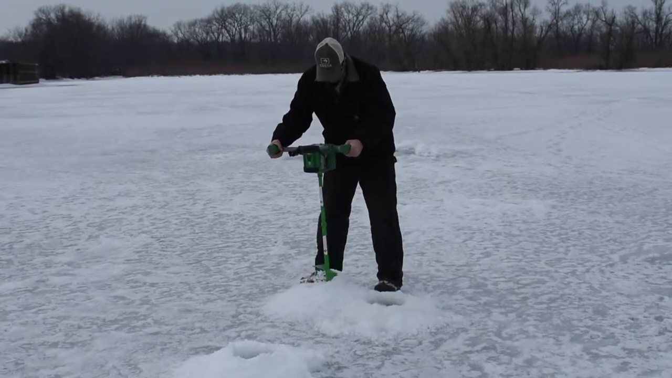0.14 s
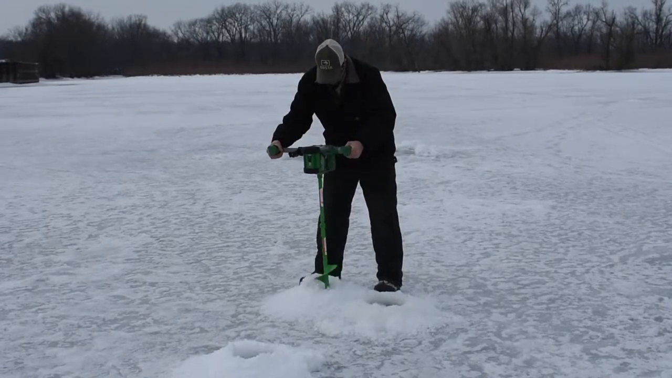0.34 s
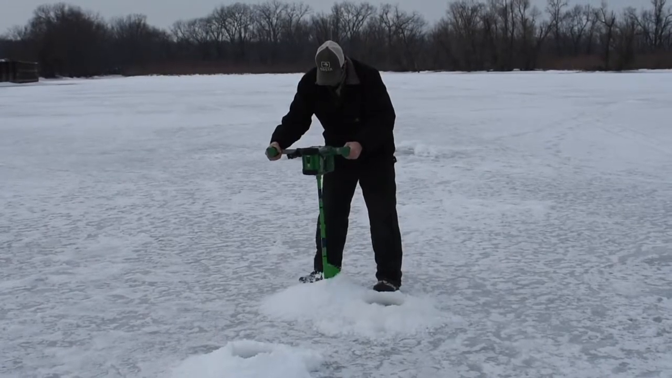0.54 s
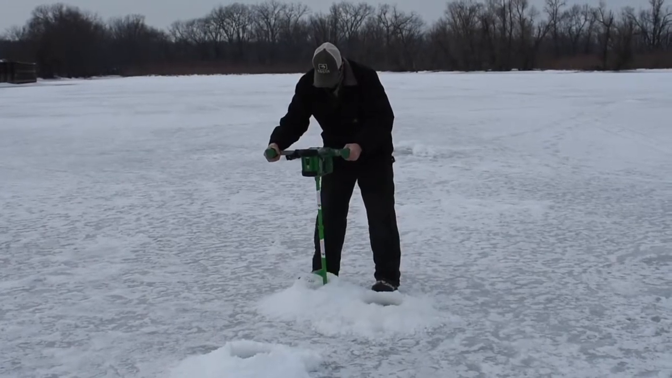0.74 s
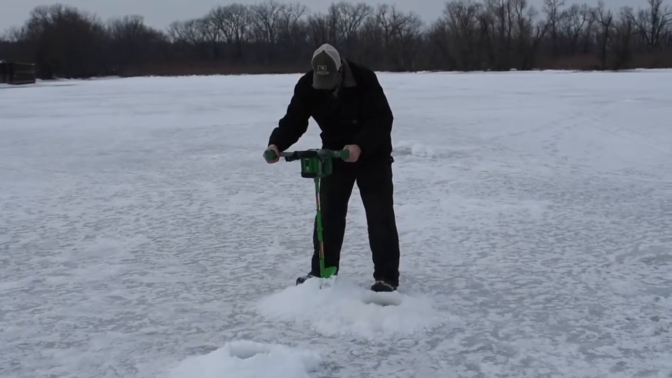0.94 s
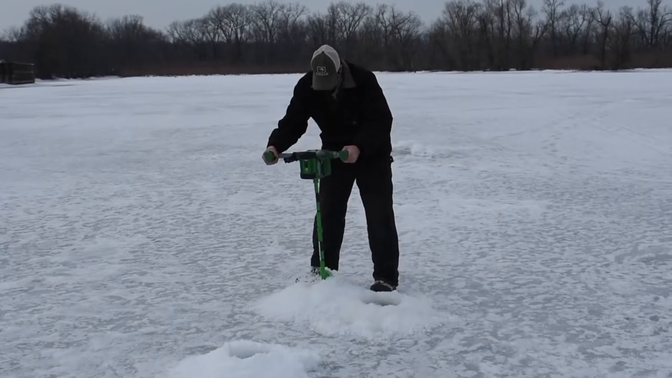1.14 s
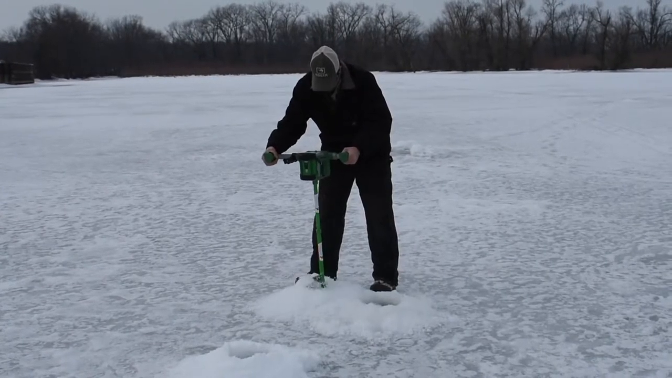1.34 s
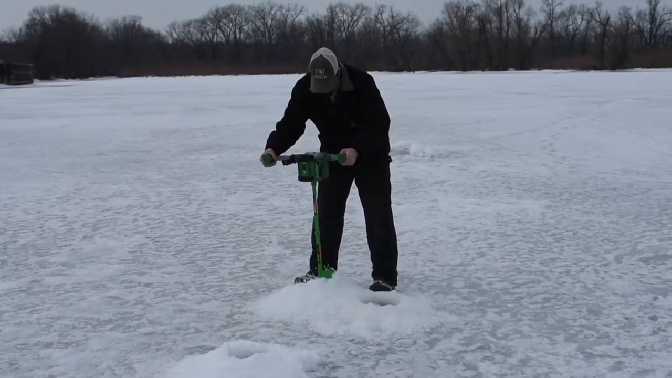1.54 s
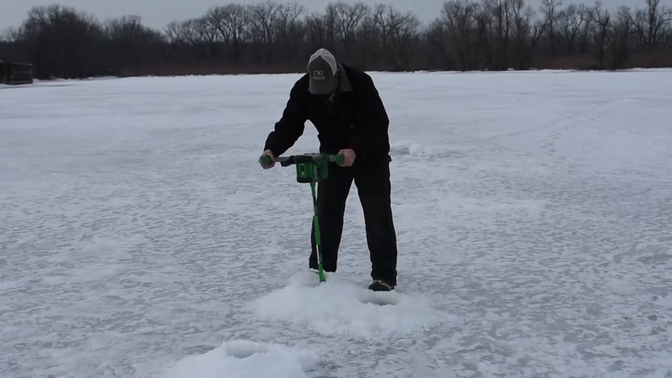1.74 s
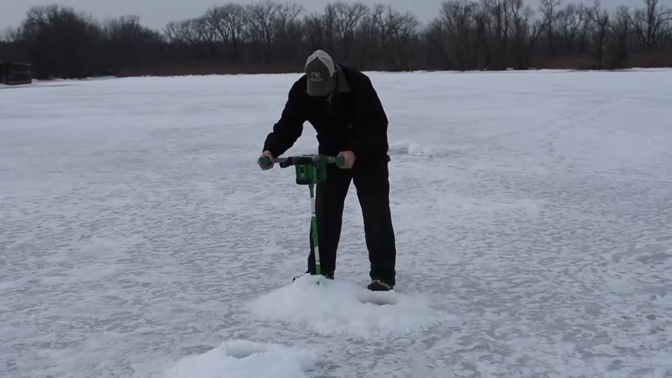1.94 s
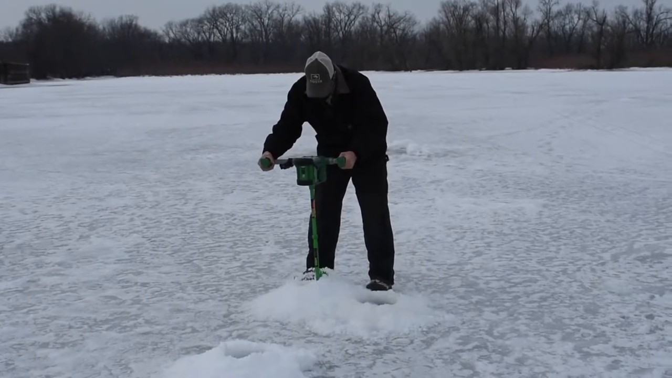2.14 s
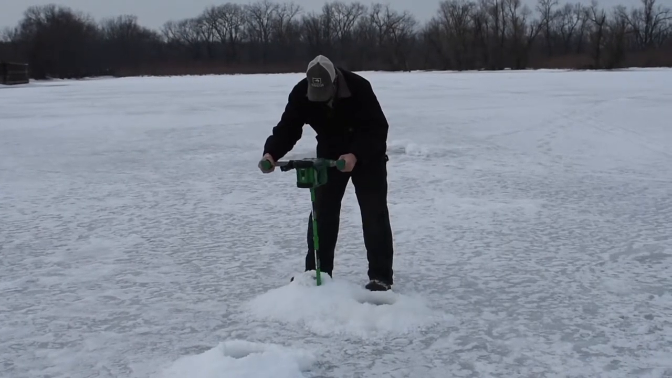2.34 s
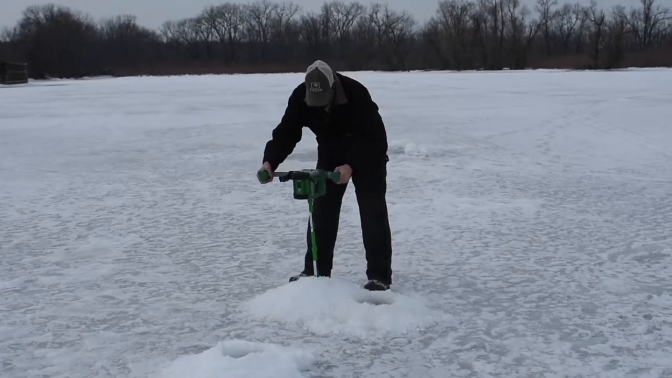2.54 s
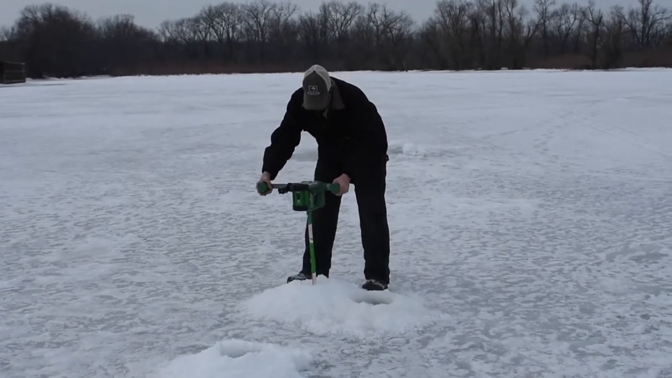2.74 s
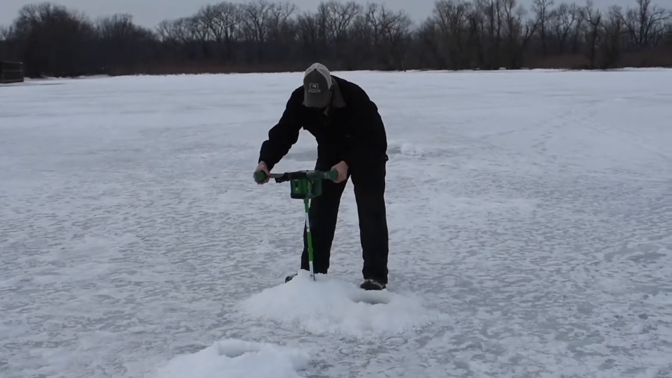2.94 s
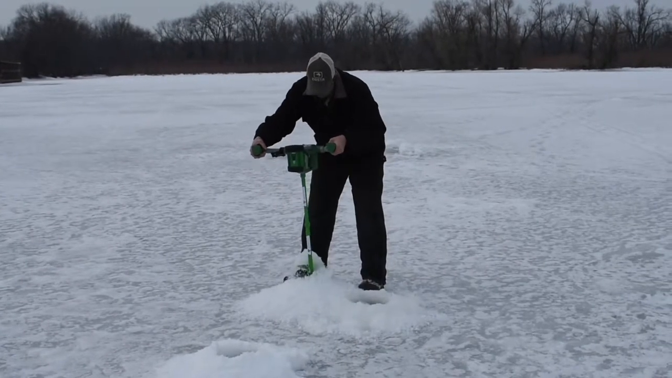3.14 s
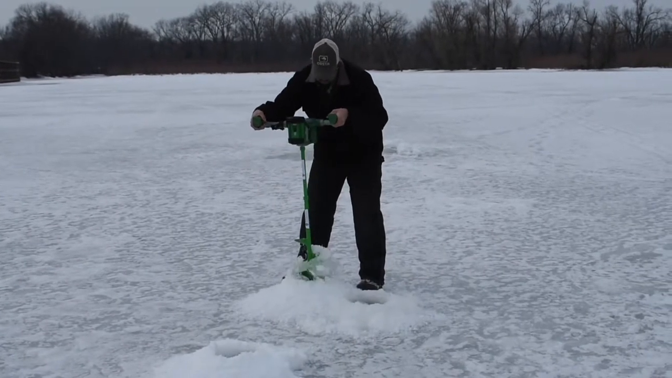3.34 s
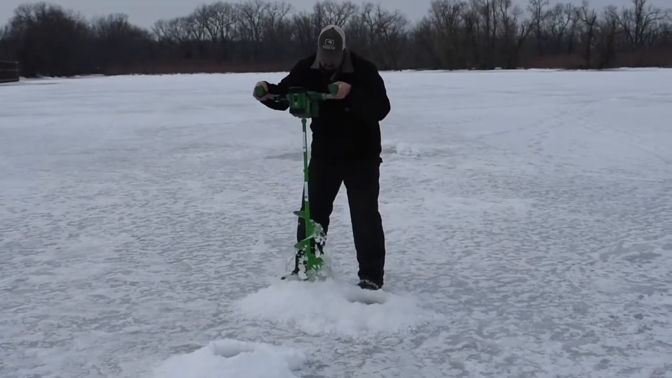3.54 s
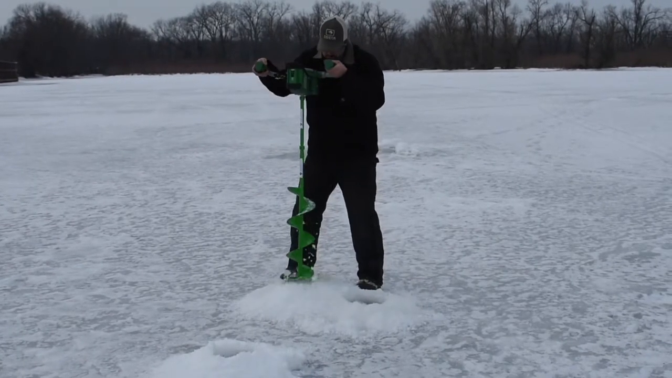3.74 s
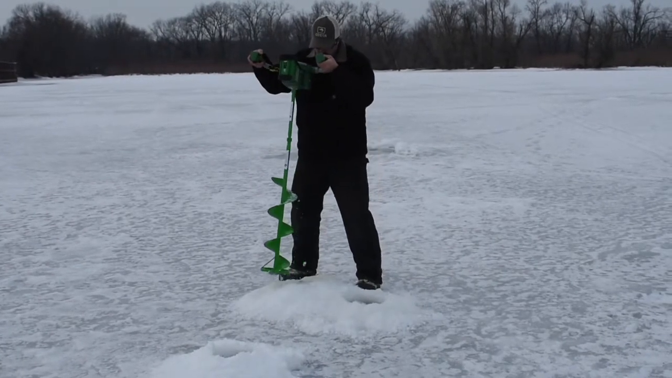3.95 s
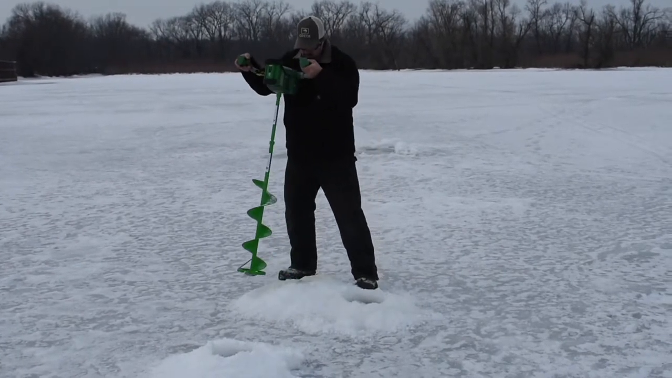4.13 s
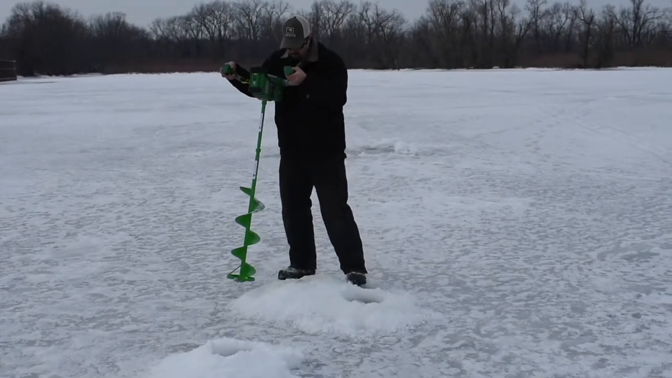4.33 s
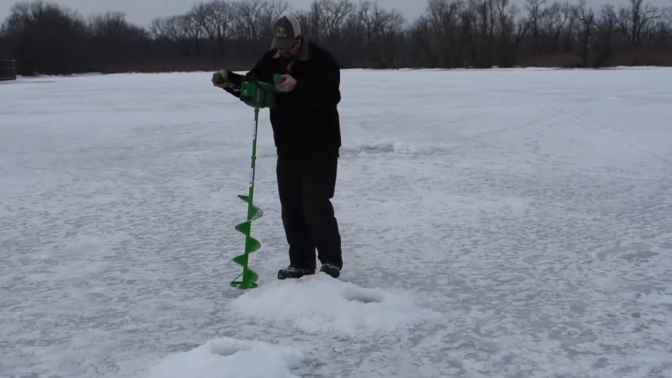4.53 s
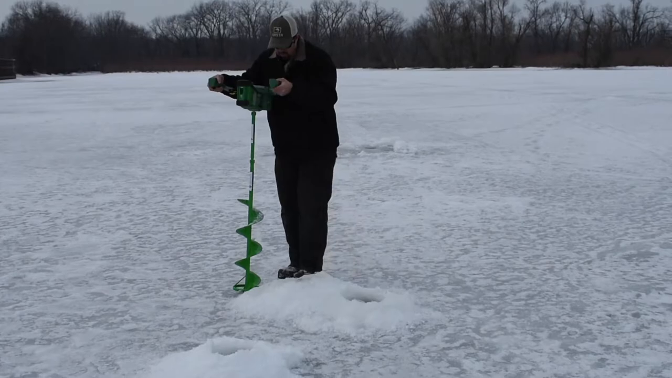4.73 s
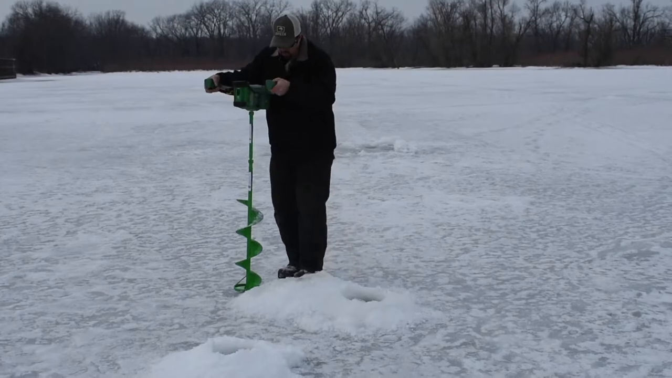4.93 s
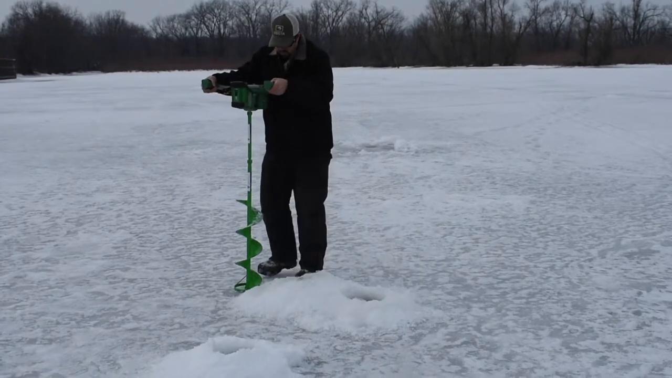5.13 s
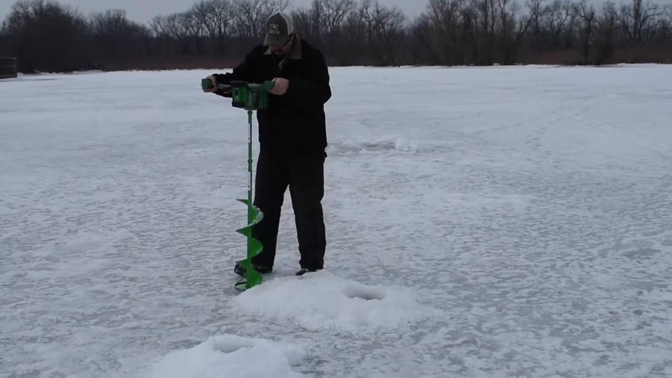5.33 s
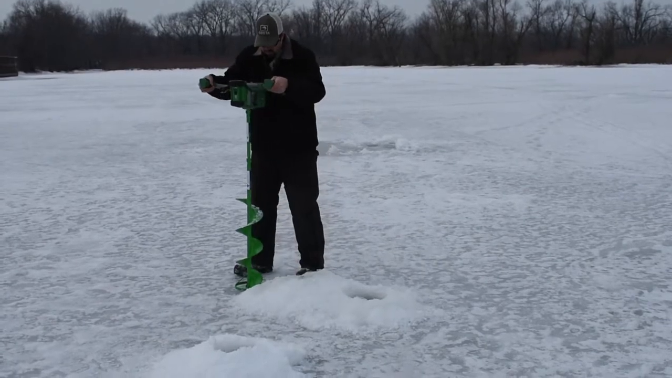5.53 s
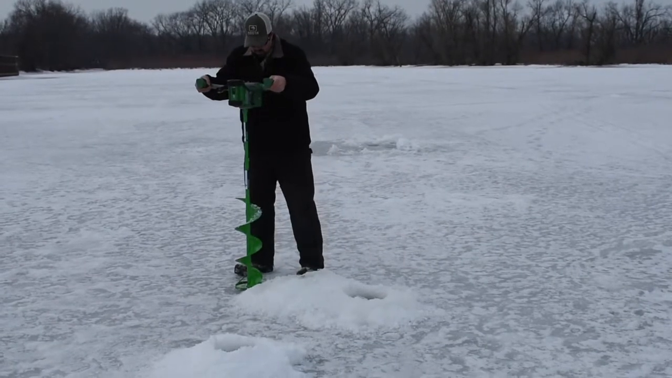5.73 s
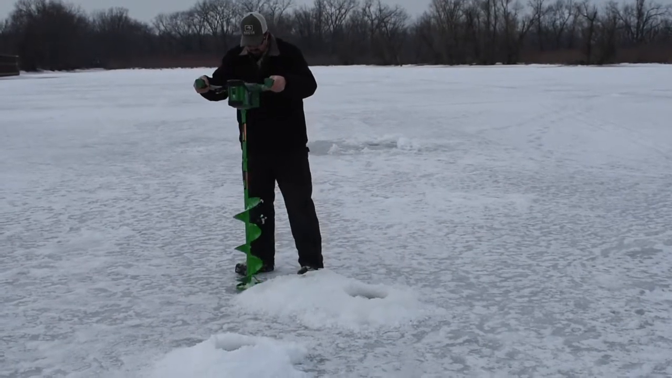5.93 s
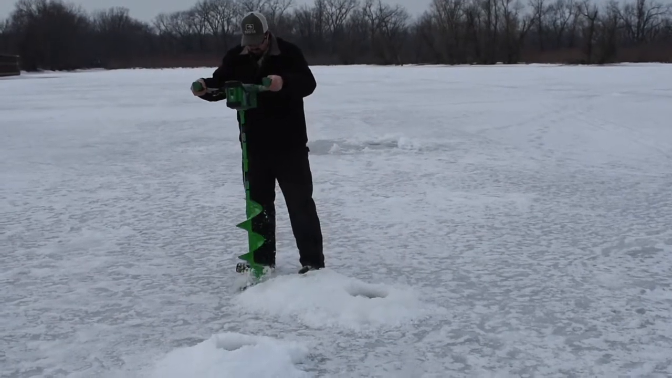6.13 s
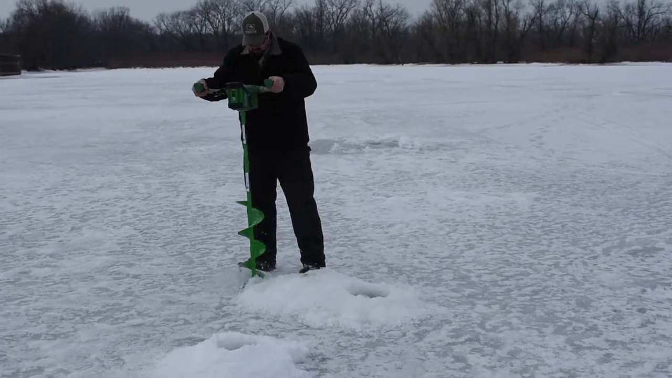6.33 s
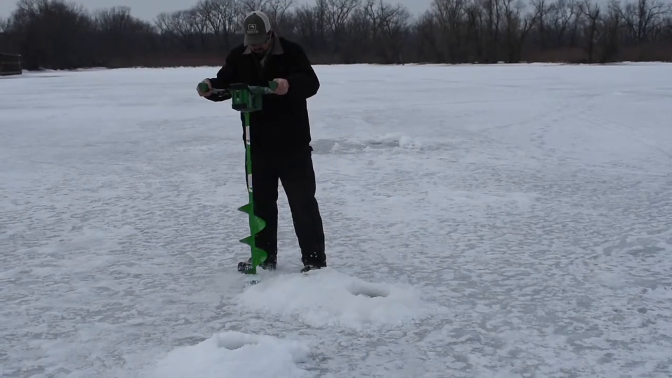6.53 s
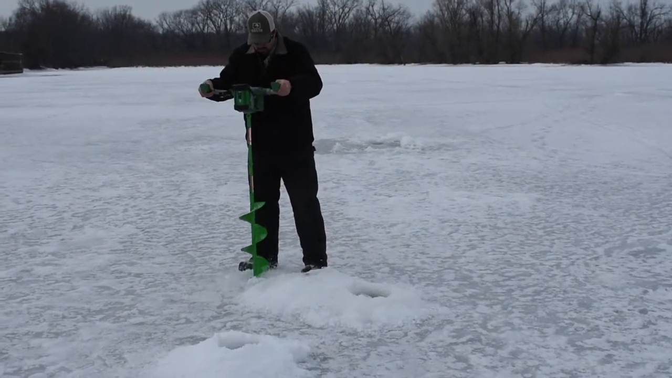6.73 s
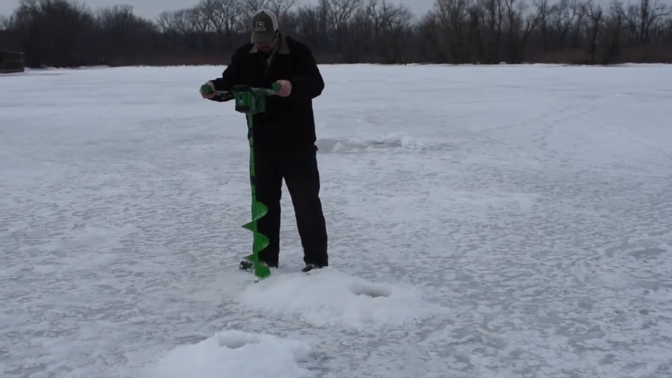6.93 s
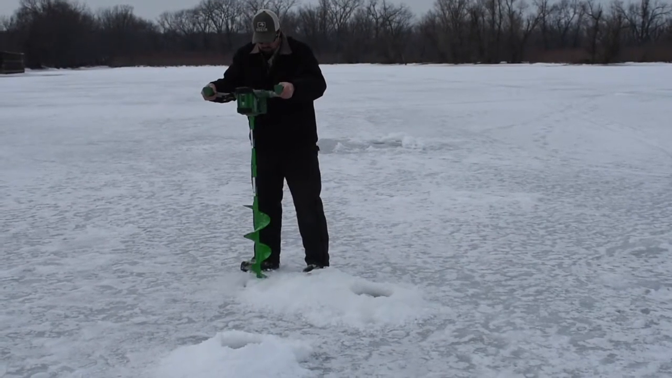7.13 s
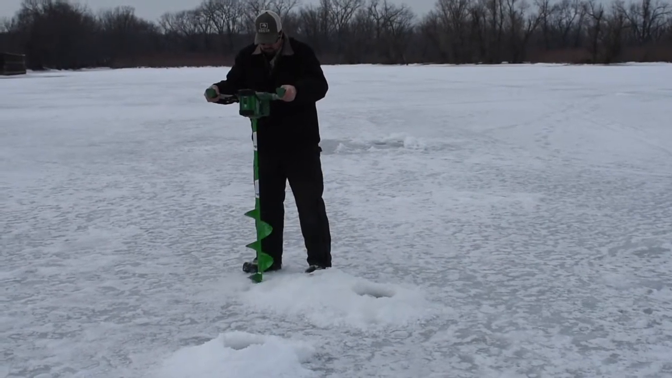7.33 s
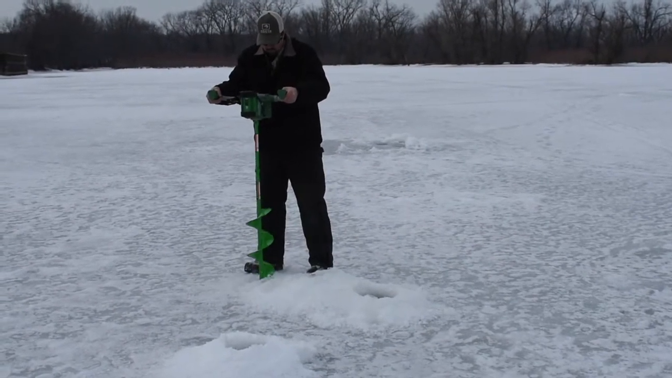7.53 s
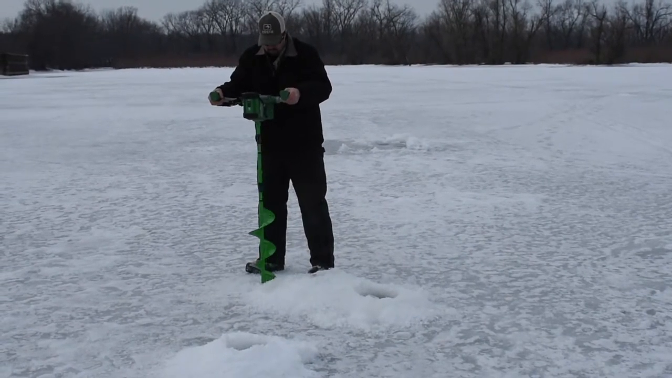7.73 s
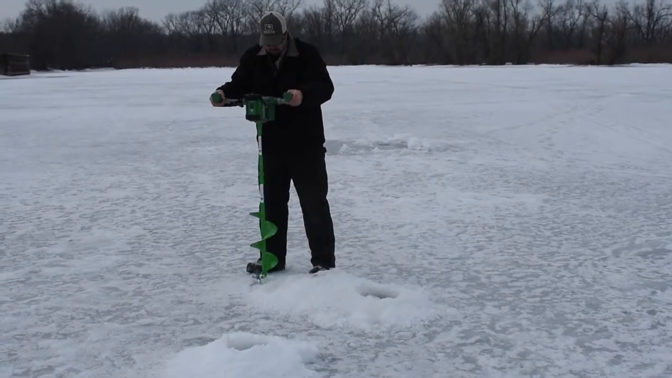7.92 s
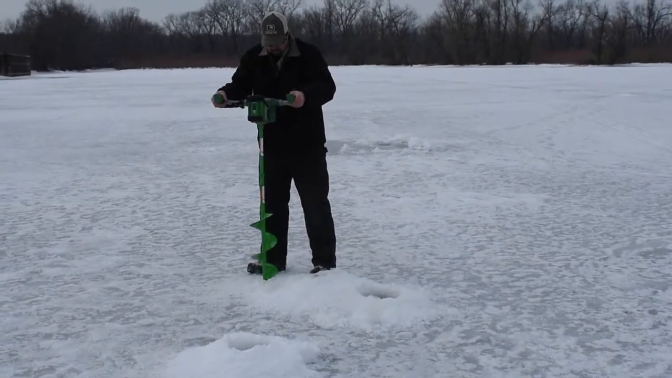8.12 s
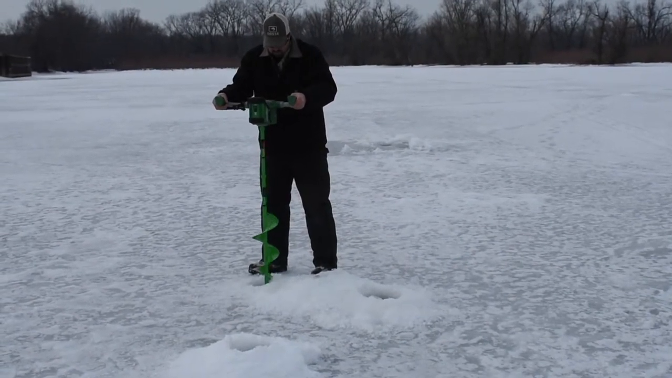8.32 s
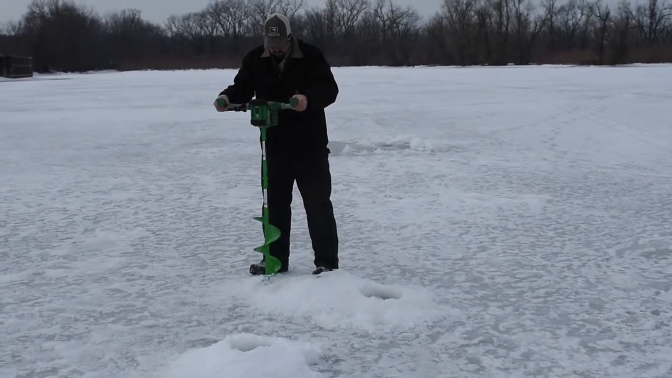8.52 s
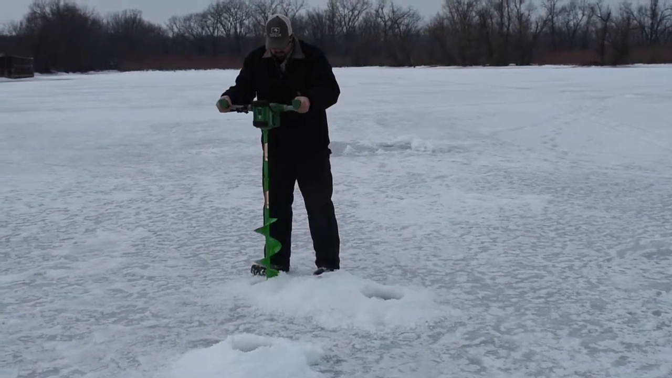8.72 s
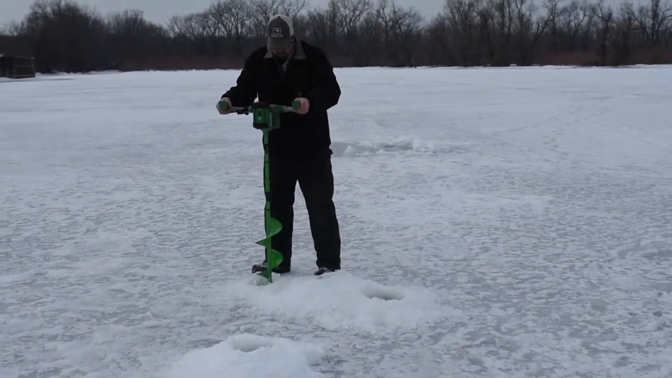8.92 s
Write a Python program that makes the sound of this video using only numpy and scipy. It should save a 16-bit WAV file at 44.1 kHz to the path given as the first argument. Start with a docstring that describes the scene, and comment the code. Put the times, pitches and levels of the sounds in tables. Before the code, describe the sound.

Close, mono outdoor sound: loud coarse ice shaving and throbbing motor gears for over two seconds, then a rattling breakthrough as the motor coasts down. In the quieter gap come water gurgles, wet crunches, drips, soft boot thuds, hard switch clicks and a faint distant motor climbing in pitch. A short scrape and rough motor start lead into a second hole, crisp and metallic at first, with whine and boom growing as it deepens.

```python
"""Blades grind through ice under a gear whine and a boom, let go amid slush and crunches, then bite again.
An electric ice auger on a frozen lake breaks through a hole, is lifted out and carried a step, and starts a new one.
Shaped noise makes the ice, slush and air; stacks of tones make the gears; short bursts and rings make the
contacts. A far motor climbs in pitch over a low outdoor rush. One microphone with gain control feeds both channels."""
import sys
import numpy as np
from scipy import signal
from scipy.fft import rfft, irfft, next_fast_len
from scipy.io import wavfile
from scipy.ndimage import uniform_filter1d, map_coordinates

SR = 44100
rng = np.random.default_rng(int(sys.argv[2]) if len(sys.argv) > 2 else 0)


def generate_wav(signal):
    """Clip the signal to [-1, 1] and save it as 16-bit WAV at the path in sys.argv[1]."""
    frames = np.transpose(np.atleast_2d(signal))
    scaled = np.clip(frames, -1, 1) * 32767
    pcm = np.round(scaled).astype(np.int16)
    wavfile.write(sys.argv[1], SR, pcm)


N = 399987

TOP_HZ = 15830  # band limit of the microphone input
# The gear tones are multiples of one low pitch; the third is the pitch listed elsewhere: multiple, level/dB
GEAR_TONES = [(3, 0), (4, -9), (5, -9), (6, -4.5), (7, -12)]


def amp(db):
    """Gain of a level in dB."""
    return 10 ** (np.asarray(db) / 20)


def unit(x):
    """x scaled to an rms of 1."""
    return x / np.sqrt(np.mean(np.abs(x) ** 2) + 1e-20)


def along(points, hz):
    """Read a curve of (f/Hz, value) points, joined by straight lines on a log frequency axis."""
    f, v = np.transpose(points)
    return np.interp(np.log(hz + 1), np.log(f + 1), v)


def curves(*tables):
    """One value per sample for each column after t/s, then a gate that is open only inside the tables."""
    t = np.arange(N) / SR
    s, *cols = np.transpose(np.vstack(tables))
    gate = sum((t >= rows[0][0]) & (t <= rows[-1][0]) for rows in tables)
    soft_gate = uniform_filter1d(gate * 1., size=2000)
    return [np.interp(t, s, c) for c in cols] + [soft_gate]


def wobble(rate):
    """A smooth random curve through `rate` random points a second."""
    return map_coordinates(rng.standard_normal(int(N * rate / SR) + 4), [np.arange(N) * rate / SR])


def filtered(x, response):
    """x with each frequency multiplied by response(f)."""
    m = next_fast_len(N + 8192)
    return irfft(rfft(x, m) * response(np.fft.rfftfreq(m, 1 / SR)), m)[:N]


def peaks(modes, f):
    """Summed gain of resonances listed as (f/Hz, width/Hz, level/dB)."""
    return sum(amp(db) / (1 + (2 * (f - c) / w) ** 2) for c, w, db in modes)


def grit(patchy_db, spiky_db, grain_hz):
    """Noise with short narrow streaks of random gain, its overall level also shaken into uneven grains."""
    z = signal.stft(rng.standard_normal(N), nperseg=512)[2]
    field = uniform_filter1d(rng.standard_normal(z.shape), size=2, axis=0)  # across pitch
    field = uniform_filter1d(field, size=6, axis=1)  # across time
    streaky = signal.istft(z * amp(patchy_db * unit(field)), nperseg=512)[1][:N]
    return streaky * amp(spiky_db * wobble(grain_hz))


def fuzzy(hz, width_hz, steady):
    """A tone on a moving pitch, partly smeared into a narrow band of noise."""
    smear = wobble(width_hz) + 1j * wobble(width_hz)
    return unit(np.real((steady + smear) * np.exp(2j * np.pi * np.cumsum(hz) / SR)))


def auger():
    """Shaving, gear whine and boom together; the two blades give shaving and whine two pulses a turn."""
    turns_per_s = 5.9 * (1 + .08 * wobble(1.5))
    turn = 2 * np.pi * np.cumsum(turns_per_s) / SR
    pulse = np.sin(2 * turn)
    bite, shave_db, drilled_s = drilling()
    return shaving(bite, shave_db, pulse) + gear_whine(pulse) + bite ** 2 * hole_boom(drilled_s)


def drilling():
    """Bite of the blades 0-1, shaving level in dB and seconds since the first bite, per sample."""
    # Blades in the ice, one row a hole: first bite/s, breakthrough/s, shaving level/dB at full bite
    runs = [(-3, 2.31, -12.5), (5.68, 9.5, -7)]
    full_bite_s, let_go_s = .43, .29
    t = np.arange(N) / SR
    hole = np.searchsorted([runs[1][0]], t)
    start, through, db = np.transpose(runs)[:, hole]
    bite = np.clip(np.minimum((t - start) / full_bite_s, 1 - (t - through) / let_go_s), 0, 1)
    return bite, db, t - start


def shaving(bite, shave_db, pulse):
    """Blades shave chips: gritty noise coloured by hole and steel, growing steeply with the bite."""
    # How far the colour is that of a deep hole: t/s, share 0-1
    deep_share = [(3, 0.96), (5.7, 0.42), (7.7, 0.03), (9.07, 0.48)]
    # Shaving heard out of a deep hole, before the steel rings: f/Hz, level/dB
    deep_colour = [(470, -27), (800, -15), (1400, -5), (1630, -8.5), (2300, -5), (6040, -12), (7470, -11.5),
                   (11100, -15.5), (15800, -28.5)]
    # Shaving at the surface, before the steel rings: f/Hz, level/dB
    shallow_colour = [(470, -51), (930, -15.5), (1070, -7.5), (1590, -3.5), (1890, -8.5), (3860, -3),
                      (8900, -11.5), (13300, -18), (15800, -33)]
    # Ringing of shaft and flights, buried and then bare: f/Hz, width/Hz, level/dB
    steel_rings = [
        [(4180, 220, -6), (7410, 87, 1.5), (8100, 170, -2.5), (11800, 100, -14)],
        [(2126, 81, 2.5), (2527, 49, 4.5), (3936, 140, -3.5), (4800, 60, -3), (7240, 110, -1),
         (9060, 830, -3.5)],
    ]
    steepness = 2.45  # power of the bite
    treble_hz, treble_power = 3300, 1.2  # shaving above this pitch needs more bite: extra power

    depth = np.clip(curves(deep_share)[0], 0, 1)
    chips = grit(patchy_db=3.0, spiky_db=1.3, grain_hz=899.4)
    deep = unit(filtered(chips, lambda f: amp(along(deep_colour, f)) * (1 + peaks(steel_rings[0], f))))
    shallow = unit(filtered(chips, lambda f: amp(along(shallow_colour, f)) * (1 + peaks(steel_rings[1], f))))
    level_db = shave_db + 0.6 * pulse + 0.9 * wobble(25)
    shave = amp(level_db) * (depth * deep + (1 - depth) * shallow)
    treble = filtered(shave, lambda f: 1 / (1 + (treble_hz / (f + 1)) ** 4))
    return bite ** steepness * (shave - treble + bite ** treble_power * treble)


def gear_whine(pulse):
    """Gears sing a stack of fuzzy tones; the blade pulses bend their pitch and make them throb."""
    # Speed sags and recovers with the push on the handles, one list a hole: t/s, f/Hz, level/dB
    whine_path = [
        [(0, 1430, -22), (.22, 1345, -24), (.37, 1420, -21), (.62, 1316, -24), (.9, 1320, -23),
         (.99, 1390, -31), (1.04, 1410, -19), (1.25, 1315, -20), (1.42, 1290, -30), (1.47, 1390, -18),
         (1.77, 1490, -18), (2.07, 1390, -18), (2.15, 1300, -27), (2.34, 1440, -19), (2.405, 1760, -21)],
        [(6.1, 1640, -27), (7.8, 1560, -18), (8.05, 1410, -19), (8.62, 1335, -17), (9.07, 1370, -18)],
    ]
    whine_hz, whine_db, loaded = curves(*whine_path)
    pitch = whine_hz * (1 + 0.016 * pulse + .007 * wobble(14))
    throb = amp(whine_db + 2.4 * pulse)
    tones = sum(amp(db) * fuzzy(k / 3 * pitch, width_hz=110, steady=1.5) for k, db in GEAR_TONES)
    return loaded * throb * tones


def hole_boom(drilled_s):
    """Air in the hole resonates; a new hole finds its voice, and the lowest mode comes in as it deepens."""
    # Air in the hole, lowest mode and then upper ones: f/Hz, width/Hz, level/dB
    air_modes = [
        [(378, 75, 0.1)],
        [(505, 110, -3), (716, 70, -5)],
    ]
    boom_db, grows_s = -31, 1.01
    lowest_starts_s, lowest_full_s = 1.4, 4.2  # seconds of drilling
    lowest, upper = (filtered(rng.standard_normal(N), lambda f: peaks(modes, f)) for modes in air_modes)
    lowest_share = np.interp(drilled_s, [lowest_starts_s, lowest_full_s], [0, 1])
    boom = (lowest_share * lowest + upper) / np.std(lowest)
    return boom * amp(boom_db) * (1 - np.exp(-drilled_s / grows_s))


def motor():
    """Off load the motor hisses through its housing; rough stacks of tones glide by as its speed changes."""
    # Motor running free: t/s, level/dB
    coasting = [(2.44, -24), (2.74, -36), (2.91, -38), (3.02, -62)]
    # Its housing, each to be squared as a sum: f/Hz, width/Hz, level/dB before squaring
    housing = [(1460, 700, -1.5), (2760, 1900, -4.5), (5400, 990, -9), (6270, 690, -6.5), (11800, 300, -9)]
    # Motor tones: t/s, length/s, starting f/Hz, final f/Hz, level/dB
    glides = [(2.413, .04, 1540, 1420, -18), (2.762, .035, 1620, 1370, -29), (2.803, .05, 1750, 1480, -29),
              (2.853, .05, 1740, 1450, -30), (5.72, .22, 15300, 15300, -45), (5.905, .05, 1230, 1620, -23),
              (5.945, .06, 1300, 1580, -18), (6.005, .09, 1200, 1540, -19), (6.155, .058, 1200, 1143, -17)]
    coast_db, free = curves(coasting)
    noise = grit(patchy_db=2.5, spiky_db=1.5, grain_hz=309)
    hiss = filtered(noise, lambda f: peaks(housing, f) ** 2 + amp(-27) * (f > 1000))
    out = free * amp(coast_db + 1.7 * wobble(40)) * unit(hiss)
    for s, length, from_hz, to_hz, db in glides:
        hz = np.linspace(from_hz, to_hz, round(length * SR))
        n = len(hz)
        phase = 2 * np.pi * np.cumsum(hz * (1 + .02 * wobble(300)[:n])) / SR
        tone = np.zeros(n)
        for k, level in GEAR_TONES:
            if k / 3 * to_hz < TOP_HZ:
                rough = amp(level + 3 * wobble(50)[:n])
                tone += rough * np.sin(k / 3 * phase + rng.uniform(0, 2 * np.pi))
        out[round(s * SR):][:n] += amp(db) * tone * np.hanning(n) ** .5
    return out


def grainy_bursts(events):
    """Noise bursts that swell and die, from (t/s, crest level/dB, response, length/s), with a rough level."""
    out, t = np.zeros(N + SR), np.arange(SR // 4) / SR
    for s, db, response, length in events:
        burst = unit(irfft(rfft(rng.standard_normal(len(t))) * response, len(t)))
        u = t / (0.28 * length)  # 1 at the crest
        out[round(s * SR):][:len(t)] += amp(db) * u * np.exp(1 - u) * burst
    return out[:N] * amp(1.5 * wobble(400))


def snags():
    """Blades snag the rim as they slow, and scrape as they first touch: bursts that rattle the steel."""
    # Snags and scrapes: t/s, crest level/dB, length/s
    catches = [(2.316, -18, .03), (2.414, -16, .045), (2.485, -22, .03), (2.624, -24, .035),
               (2.67, -26, .03), (2.764, -27, .025), (2.855, -31, .05), (5.706, -46, .03),
               (5.755, -42, .04), (5.863, -26, .022)]
    # Bare flights: f/Hz, width/Hz, level/dB
    rattle = [(1500, 300, 1), (2600, 500, -1), (3300, 500, -2), (4350, 200, -8), (5800, 1200, -13)]
    f = np.fft.rfftfreq(SR // 4, 1 / SR)
    steel = peaks(rattle, f) + amp(-26) * (f > 900)
    return grainy_bursts([(s, db, steel, length) for s, db, length in catches])


def cracks():
    """Ice chips and snow crust crack: noise bursts around one pitch, with some wide treble."""
    # Cracks: t/s, crest level/dB, centre f/Hz, length/s
    crack_events = [(3.131, -30, 1520, .025), (3.377, -33, 1100, .024), (3.517, -32, 2200, .015),
                    (3.693, -33, 3440, .017), (3.72, -24, 3760, .012), (3.744, -24, 2000, .013),
                    (3.5, -36, 1100, .04), (3.984, -36, 2400, .012), (4.082, -35, 5000, .006),
                    (4.397, -30, 4500, .0025), (4.703, -24, 3600, .022), (4.71, -24, 1300, .025),
                    (4.732, -30, 2500, .025), (4.844, -31, 6000, .005), (5.175, -38, 5400, .006),
                    (5.26, -38, 4560, .0088), (5.28, -40, 4500, .01), (5.39, -38, 8000, .0054),
                    (5.464, -41, 8500, .005), (5.492, -32, 7000, .002), (5.536, -40, 2500, .0037)]
    f = np.fft.rfftfreq(SR // 4, 1 / SR)
    wide = amp(-5) * (f > 700) / (1 + (f / 11000) ** 2)
    crust = lambda hz: wide + 1 / (1 + (f / hz - hz / (f + 1)) ** 2 / 0.57 ** 2)
    return grainy_bursts([(s, db, crust(hz), length) for s, db, hz, length in crack_events])


def slush():
    """Wet ice and snow crust crunch as a fine spray of grains; water gurgles off the flights in duller lumps."""
    # Slush and snow crunch between holes: t/s, level/dB
    crunch_path = [(2.5, -40), (2.95, -50), (3.36, -42), (3.63, -35), (3.78, -34), (3.9, -43), (4.3, -45),
                   (4.62, -54), (4.82, -45), (5, -58.5), (5.75, -56)]
    # Colour of the crunch: f/Hz, level/dB
    crunch_colour = [(180, -39), (400, -3), (800, -15), (3000, -10.5), (9000, -12.5), (15800, -23)]
    # Water running off the flights: t/s, level/dB
    pour_path = [(2.5, -42), (3, -45), (3.4, -41), (3.62, -33), (3.7, -48)]
    # Colour of the gurgle: f/Hz, width/Hz, level/dB
    gurgle_modes = [(430, 160, 3), (950, 700, -1)]
    crunch_db, moving = curves(crunch_path)
    pour_db, lifting = curves(pour_path)
    grains = grit(patchy_db=.8, spiky_db=3.2, grain_hz=700) * amp(2 * wobble(35))
    crunch = unit(filtered(grains, lambda f: amp(along(crunch_colour, f))))
    lumps = grit(patchy_db=3, spiky_db=5, grain_hz=50)
    pour = unit(filtered(lumps, lambda f: peaks(gurgle_modes, f)))
    return moving * amp(crunch_db) * crunch + lifting * amp(pour_db) * pour


def clicks():
    """Hard plastic snaps: the same small part rings each time, with a tick of bright noise."""
    # Clicks: t/s, level/dB
    snaps = [(2.4523, -4), (2.646, -11), (3.776, -5.5), (4.9543, -3.5), (4.9914, -18)]
    # Ringing of the plastic: f/Hz, level/dB, time to fall 60 dB/s
    plastic_modes = [(1400, -24, 0.03), (2800, 1.5, 0.0065), (4500, -7, 0.011), (7000, -16, 0.0046)]
    out, t = np.zeros(N + SR), np.arange(SR // 20) / SR
    for s, db in snaps:
        ring = np.zeros(len(t))
        for hz, level, t60 in plastic_modes:
            ring += amp(level + rng.normal(0, 0.5) - 60 * t / t60) * np.sin(2 * np.pi * hz * t)
        ring += amp(-23 - 60 * t / .005) * np.diff(rng.standard_normal(len(t) + 1))
        out[round(s * SR):][:len(t)] += amp(db) * (1 - np.exp(-t / 0.0002)) * ring
    return out[:N]


def thuds():
    """Soft contacts: one short, rough low ring that rises in pitch and swells in over a few ms."""
    # Boots, slush gulps and the auger set down: t/s, level/dB before swell and decay, starting f/Hz
    contacts = [(3.131, -11, 477), (3.164, -19, 460), (3.388, -22, 450), (3.455, -22, 390),
                (3.505, -17, 382), (3.588, -25, 532), (3.625, -22, 300), (3.825, -29, 194),
                (3.893, -28, 150), (4.022, -21, 237), (4.364, -22, 223), (4.411, -27, 150),
                (4.553, -24, 150), (4.843, -21, 418), (4.923, -29, 183), (5.274, -20, 167),
                (6.058, -22, 150)]
    t60_s = .058  # time to fall 60 dB
    out, t = np.zeros(N + SR), np.arange(SR // 4) / SR
    swell = 1 - np.exp(-(t / 0.004) ** 2)
    for s, db, hz in contacts:
        ring = np.sin(2 * np.pi * hz * t * (1 + 1.14 * t)) + 0.25 * np.sin(2 * np.pi * 2.3 * hz * t)
        out[round(s * SR):][:len(t)] += amp(db - 60 * t / t60_s) * swell * ring
    return out[:N] * amp(2.5 * wobble(150))


def drips():
    """Drops off the flights: short bubbles that rise in pitch as they die away."""
    # Drops: t/s, starting f/Hz, level/dB before swell and decay
    drops = [(3.808, 1500, -27), (3.832, 2100, -30), (4.101, 1800, -26)]
    rise_per_s, t60_s = 90, .025  # pitch rise as a share of the start; time to fall 60 dB
    out, t = np.zeros(N + SR), np.arange(SR // 30) / SR
    for s, hz, db in drops:
        bubble = np.sin(2 * np.pi * hz * t * (1 + rise_per_s * t / 2))
        out[round(s * SR):][:len(t)] += amp(db - 60 * t / t60_s) * (1 - np.exp(-t / .002)) * bubble
    return out[:N]


def far_motor():
    """A far motor: a fuzzy tone that climbs towards its final pitch while it fades."""
    from_s, to_s = 3.88, 5.85
    start_hz, final_hz, climb_s = 1200, 1800, 1.4
    start_db, fade_db_per_s = -42, 5.5
    since, heard = curves([(s, s - from_s) for s in (from_s, to_s)])
    hz = final_hz + (start_hz - final_hz) * np.exp(-since / climb_s)
    level = np.minimum(since / .4, 1) * amp(start_db - fade_db_per_s * since)
    return heard * level * fuzzy(hz, width_hz=160, steady=.2)


def low_hum():
    """A brief low hum: one fuzzy tone that swells and fades."""
    # Hum: t/s, level/dB
    hum_path = [(5.3, -54), (5.6, -48), (5.93, -47), (6.05, -54)]
    hum_db, humming = curves(hum_path)
    return humming * amp(hum_db) * fuzzy(np.full(N, 218), width_hz=100, steady=1.1)


def outdoors():
    """A steady rush of noise with lumpy wind in the bass, which rumbles more while the auger is carried."""
    # Colour of the rush: f/Hz, level/dB
    rush_colour = [(25, -54), (179, -12.5), (769, -3.5), (1220, -7), (1470, -6), (1730, -15), (9460, -28.5),
                   (15800, -62)]
    wind_colour = [(25, -34), (60, -9.5), (140, -7), (260, -8.5), (500, -47)]  # f/Hz, level/dB
    rush_db, wind_db = -45, -55
    carried_s, rumble_db = (2.6, 4.95), 6.5  # from-to, extra bass
    air = grit(patchy_db=1.5, spiky_db=1.2, grain_hz=30)
    rush = unit(filtered(air, lambda f: amp(along(rush_colour, f))))
    bass = filtered(rng.standard_normal(N), lambda f: amp(along(wind_colour, f)))
    wind = unit(bass * amp(4.3 * wobble(13)))
    carried = curves([(s, 0) for s in carried_s])[-1]
    return amp(rush_db) * rush + amp(wind_db + rumble_db * carried) * wind


def scene():
    """All sources reach one microphone, which feeds both channels."""
    ice_work = auger() + motor() + snags() + cracks() + slush()
    contacts = clicks() + thuds() + drips()
    background = far_motor() + low_hum() + outdoors()
    return np.tile(ice_work + contacts + background, (2, 1))


def record(dry):
    """Gain control ducks after peaks and slowly recovers; the input rounds off peaks and trims bass and top."""
    knee_db, squeeze = -36, .501  # ducking starts here, dB of duck per dB above
    recover_db_per_s, react_s = 33, .005  # fall of the held peak level; averaging time of the duck
    fall_db = recover_db_per_s * np.arange(N) / SR
    peak_db = 20 * np.log10(np.abs(dry[0]) + 1e-6)
    held_db = np.maximum.accumulate(peak_db + fall_db) - fall_db
    span = round(react_s * SR)
    # the average looks back only, so the duck lags the peaks
    duck_db = uniform_filter1d(squeeze * np.maximum(held_db - knee_db, 0), size=span, origin=(span - 1) // 2)
    level = dry * amp(-duck_db)
    soft = level / (1 + np.abs(level / .22) ** 4) ** (1 / 4)  # no peak passes .22 here
    band = lambda hz: (hz < TOP_HZ) * hz ** 2 / (hz ** 2 + 45 ** 2)
    return np.array([filtered(x, band) for x in soft])


dry = scene()
out = record(dry)
generate_wav(out)
```